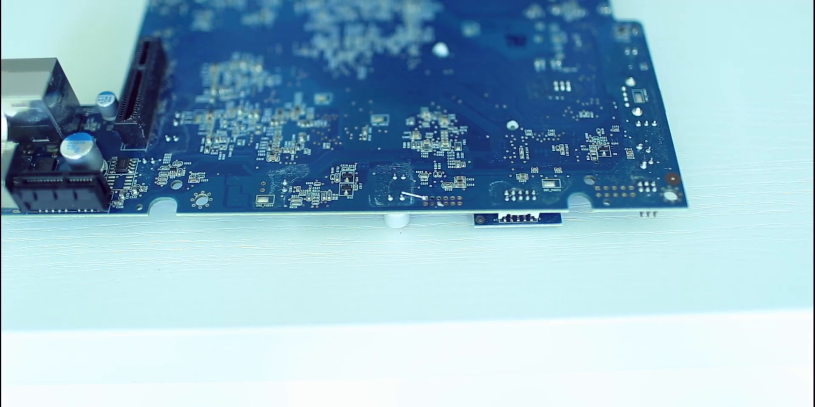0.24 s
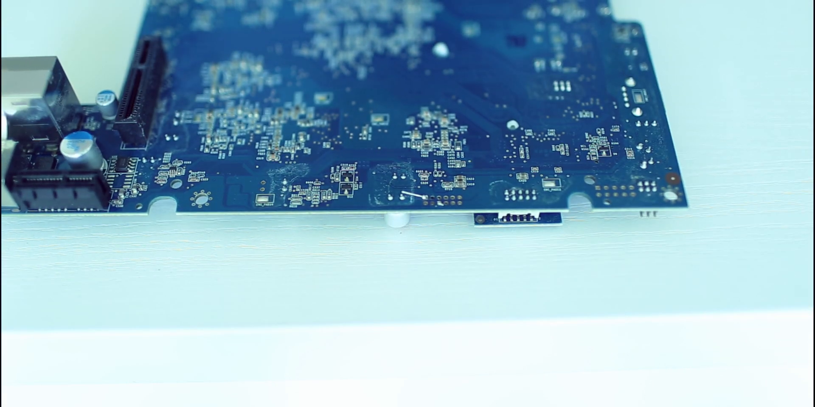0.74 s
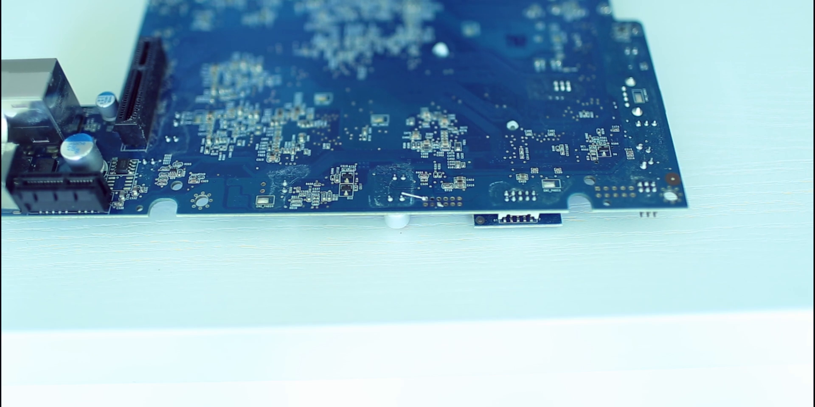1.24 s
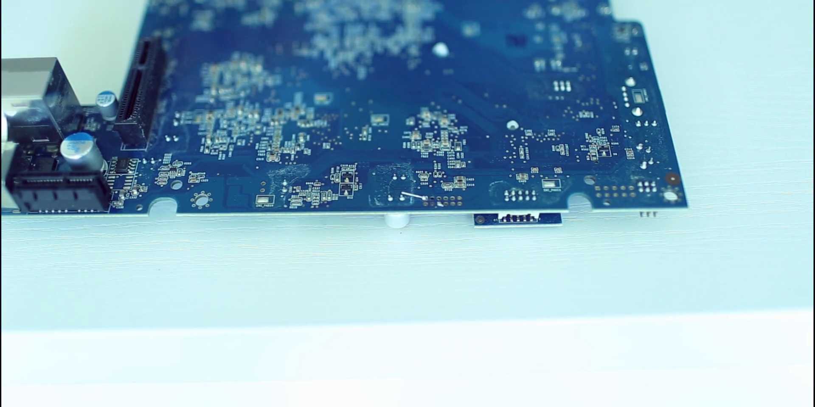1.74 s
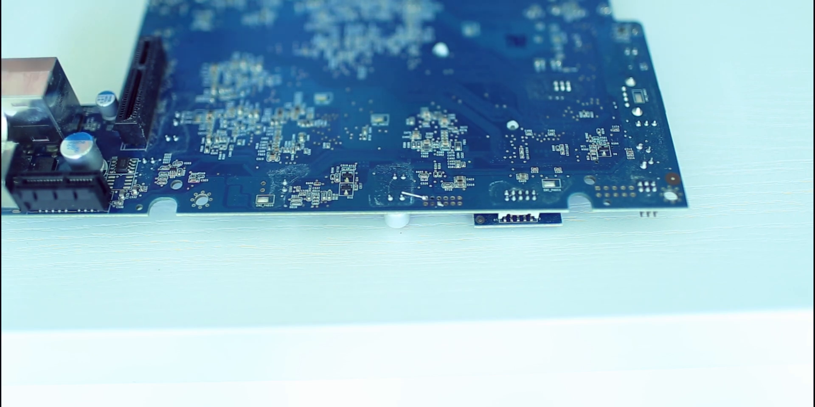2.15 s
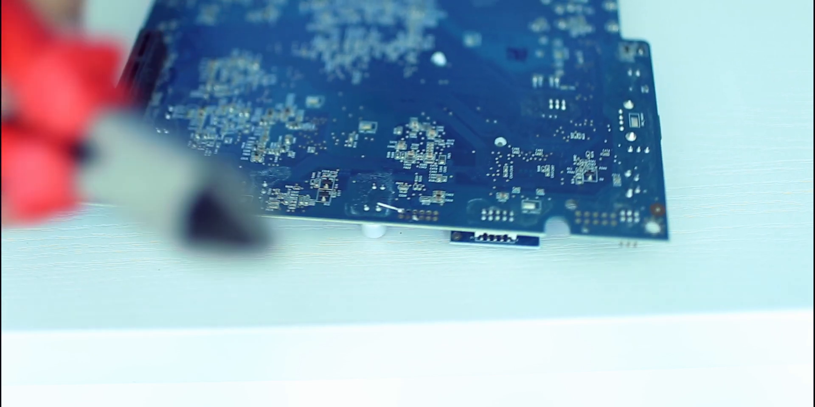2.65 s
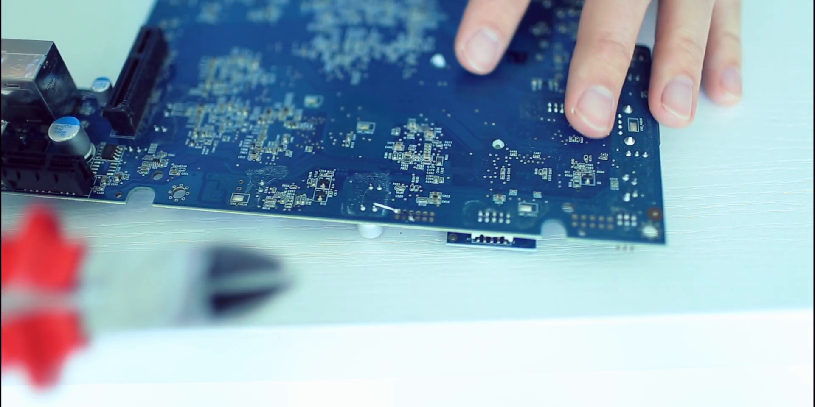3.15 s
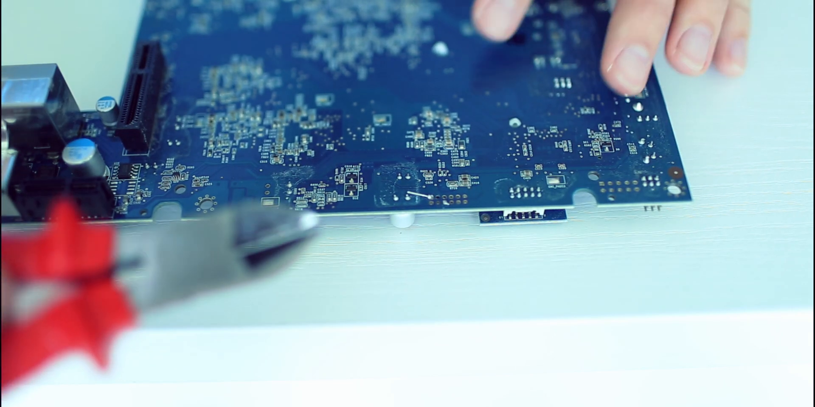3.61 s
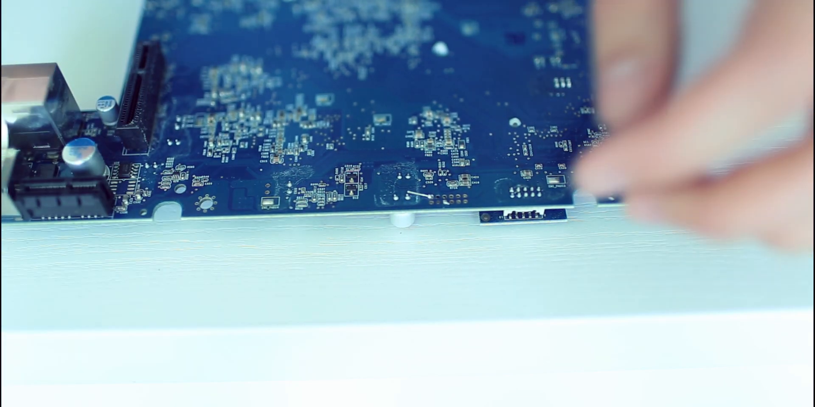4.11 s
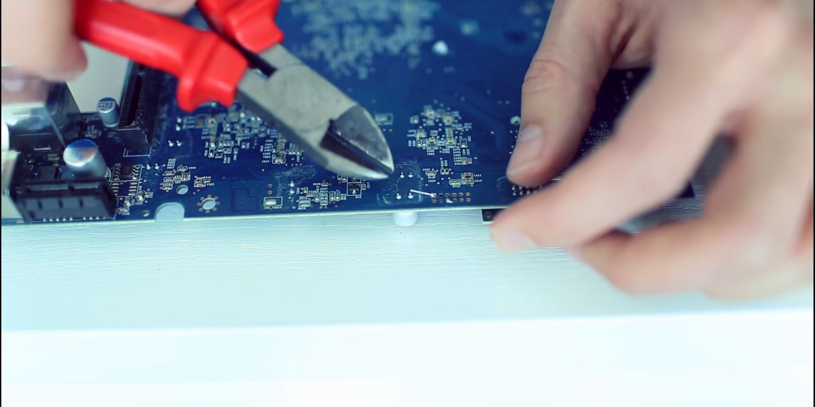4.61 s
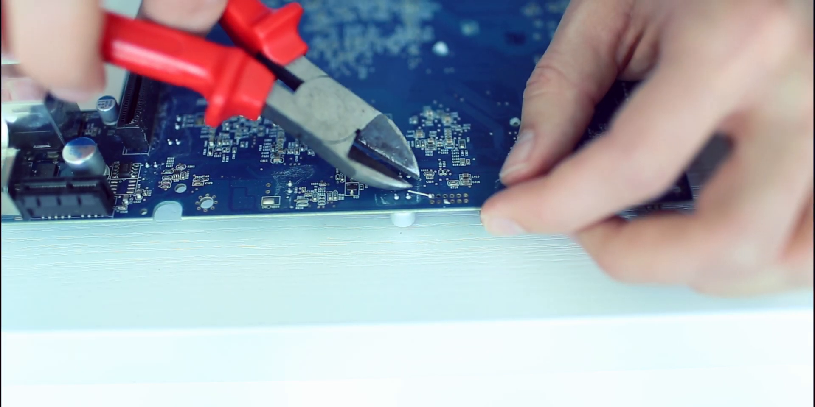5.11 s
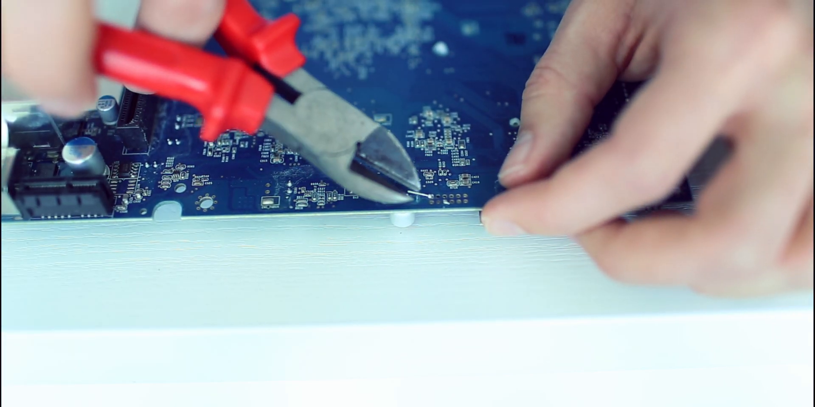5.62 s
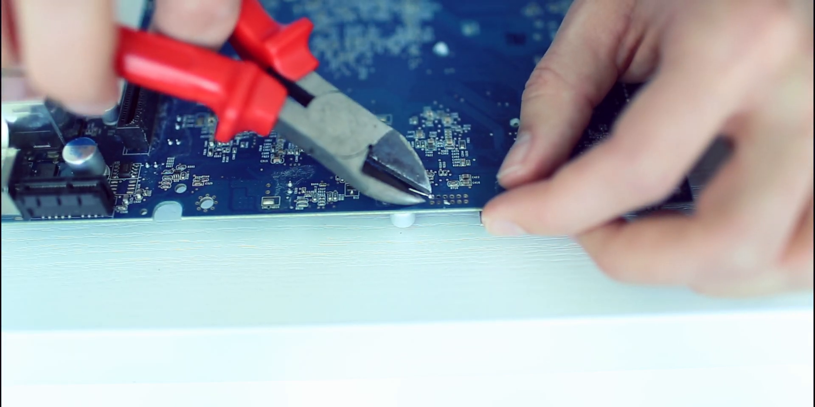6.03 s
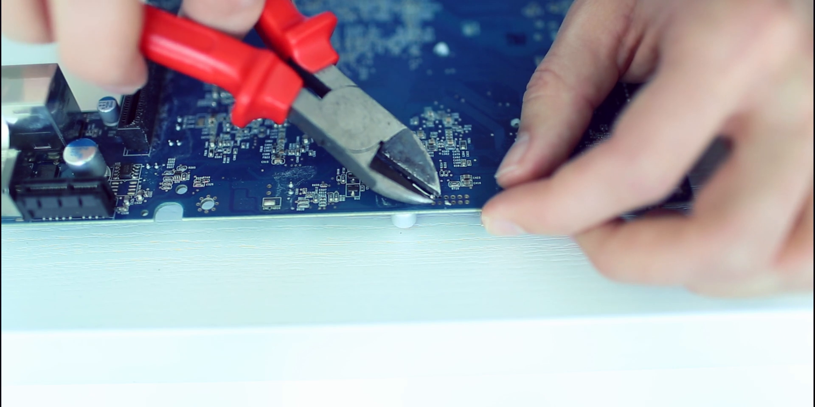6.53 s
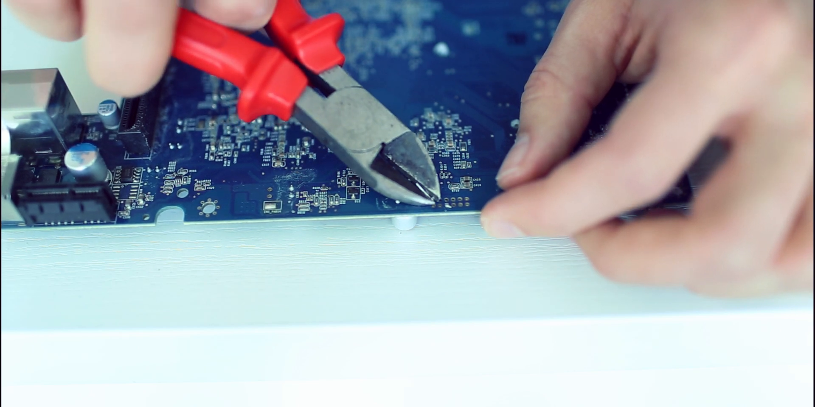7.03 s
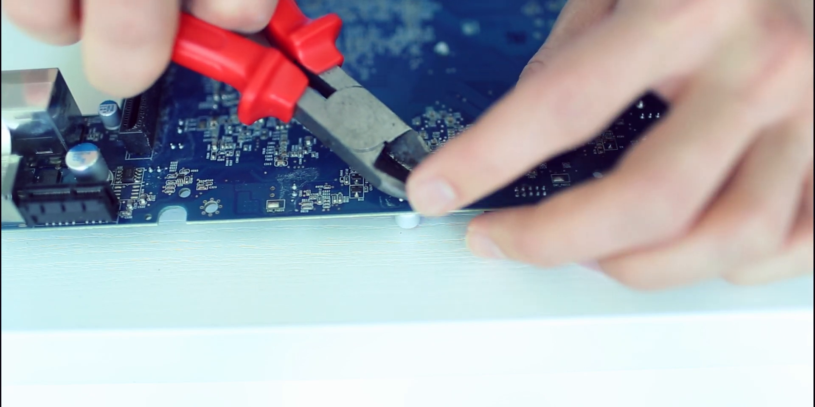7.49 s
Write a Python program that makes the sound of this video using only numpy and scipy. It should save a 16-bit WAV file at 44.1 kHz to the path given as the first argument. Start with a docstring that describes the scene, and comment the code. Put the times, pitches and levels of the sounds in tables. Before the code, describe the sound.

A hollow object rocks and settles, a tool knocks down, then a circuit board squeaks, rattles and is snipped once with side cutters.

```python
"""Circuit board work at a bench

In a small quiet room, something hollow rocks ever faster and settles, and a tool is put down with a knock.
A circuit board is shoved across the bench, squealing as it sticks and slips, and is nudged straight.
Side cutters tap among its pins and snip once. Blows and friction make each object ring at its own
natural pitches, called modes. Short echoes and a faint hiss lie behind it all."""
import sys
import numpy as np
from scipy import signal
from scipy.io import wavfile
from scipy.ndimage import uniform_filter1d

SR = 44100
rng = np.random.default_rng(int(sys.argv[2]) if len(sys.argv) > 2 else 0)


def unload_audio(sound):
    """Save the sound as a 16-bit wav file, at the path given as the first command line argument."""
    columns = np.transpose(np.atleast_2d(sound))
    # keep every value between -1 and 1, then stretch to whole-number steps
    steps = np.round(np.clip(columns, -1, 1) * 32767)
    wavfile.write(sys.argv[1], SR, steps.astype(np.int16))


N = 342216
T = np.arange(SR // 2) / SR  # the life of one sound, in seconds

# Taps on the board. Each row: start in seconds, level in dB, chatter time in seconds, hardness in dB,
# boost of the low modes in dB (set by the place struck).
BOARD_TAPS = [(0.086, -32, .009, -14, 2.5), (3.336, -7.5, 0.0084, 5, 9), (3.368, -5, 0.019, -2, 6),
              (3.42, -17, 0.0071, -4, 9), (3.444, -11, 0.024, -9, 0.5), (3.576, -13, 0.0052, -13, 2),
              (4.355, -34, 0.00098, 7, 1), (4.57, -26, 0.0084, -27, 10.5), (4.638, -39.5, 0.014, -25, 4),
              (4.875, -13.5, 0.0024, 0, 6), (5.21, -24.5, 0.015, 10, 15), (5.705, -22.5, 0.0042, -16, 0.5),
              (5.766, -17.5, 0.0086, -12.5, 4), (6.029, -34.5, 0.0034, -31.5, 10.5),
              (6.101, -49, 0.018, -21, -5), (6.172, -46.5, .006, 0.5, 7),
              (6.389, -29.5, 0.0063, -24.5, 1.5), (6.558, -47, 0.0063, 1.5, -2.5),
              (6.718, -54, .003, -8, -4.5), (7.317, -24.5, 0.015, -35, -9.5)]
# The board's ringing. Each row: pitch in Hz, level in dB, seconds to fade by 60 dB (called t60).
BOARD_MODES = [(590, -11, .25), (650, -10, .2), (760, -10, .2), (830, -4, .22), (900, -8, .12),
               (955, -1, .24), (995, -5, .2), (1150, -3, .22), (1218, 0, .25), (1357, -3, .22),
               (1440, -8, .18), (1500, -5, .2), (1537, -6, .2), (1664, -7, .22), (1975, -1, .2),
               (2040, -6, .14), (2086, -4, .15), (2172, -5, .15), (2300, -10, .08), (2451, -8, .18),
               (2505, -11, .15), (2620, -12, .12), (2885, -14, .17), (3220, -21, .08), (3980, -20, .07),
               (4200, -21, .08)]
# The board's crowd of fast-dying modes. Each row: frequency in Hz, level in dB.
BOARD_CLATTER = [(60, -36.5), (500, -22.5), (660, -8.5), (950, -2.5), (1500, -2.5), (1830, -13), (2020, 1),
                 (2450, -7), (2790, -15.5), (3100, -15.5), (4150, -21), (4700, -26.5), (9000, -32.5),
                 (15500, -50)]
# The long shove. Each row: time in seconds, relative friction level in dB, relative squeal level in dB.
SHOVE_LEVELS = [(2.578, -44, -34), (2.602, -26.5, -21.5), (2.622, -18.5, -21), (2.646, -22.5, -22.5),
                (2.664, -21.5, -19), (2.676, -25, -22.5), (2.724, -29, -28.5), (2.778, -45, -24.5),
                (2.9, -54.5, -78)]
# How the bench top deepens the drag. Each row: frequency in Hz, gain in dB.
DRAG_COLOUR = [(250, 2.5), (560, 7.5), (950, -2.5), (2500, -0.5)]
# Short slides. Each row: middle in seconds, level in dB, swell time in seconds, hardness in dB.
BOARD_SCRAPES = [(2.837, -38.5, 0.014, 1.5), (3.266, -19.5, 0.018, -5), (3.358, -17, 0.017, 10),
                 (3.467, -27.5, 0.019, -9), (3.538, -43.5, 0.025, 2), (4.857, -45.5, 0.021, -2),
                 (5.18, -42.5, 0.0096, -17.5), (5.692, -35.5, 0.008, 3), (5.739, -38.5, .017, -11.5),
                 (7.33, -37, 0.016, -31.5)]
# Cutter clicks. Each row: start in seconds, level in dB, chatter time in seconds, hardness in dB.
CUTTER_CLICKS = [(1.1367, -49, .001, 11), (1.155, -48, .0023, 17), (1.5663, -26, 0.02, 3),
                 (1.987, -49.5, 0.027, 1), (5.264, -12.5, 0.03, -5), (5.2998, -16.5, 0.0048, -8)]
# The steel jaws' ringing. Each row: pitch in Hz, level in dB, t60 in seconds.
JAW_MODES = [(2089, 0, .2), (2210, 0, .08), (2376, -3, .08), (3050, 0, .09), (4285, -9, .12),
             (5017, -2, .1), (5819, -3, .1), (6562, 0, .07), (7380, 0, .1), (8102, -3, .1), (8856, -5, .1),
             (9981, -7, .16)]
# The jaws breaking through wire. Each row: frequency in Hz, level in dB.
WIRE_CRACK = [(100, -31), (600, -10.5), (1700, -12), (2100, -0.5), (3100, -6), (3800, -11.5), (5000, -6),
              (7400, -4), (10300, -9.5), (11500, -17.5), (15500, -20.5)]
# A pin's ringing. Each row: pitch in Hz, level in dB, t60 in seconds.
PIN_MODES = [(1192, -0.5, 0.057), (2070, -11.5, 0.086), (3330, -11, 0.069)]
# Landings of the hollow thing. Each row: start in seconds, level in dB.
LANDINGS = [(0.8783, -19.5), (1.0353, -18.5), (1.237, -23), (1.3579, -19), (1.5002, -27.5), (1.607, -21),
            (1.7327, -31), (1.819, -25), (1.926, -37.5), (2.000, -29), (2.093, -45), (2.158, -36)]
# Its weaker modes. Each row: pitch in Hz, level in dB, t60 in seconds.
HOLLOW_MODES = [(250.4, -20.5, 0.17), (320.4, -14.5, 0.055), (754, -14.5, 0.049), (999, -26.5, 0.098),
                (1177, -23.5, 0.046), (1440, -28, 0.11), (1512, -23.5, 0.033)]
# The grit under its rim. Each row: frequency in Hz, gain in dB.
RIM_GRIT = [(80, -15), (300, 0), (600, 6), (900, -3), (1500, -2), (2200, -11), (4500, -13), (7000, -32)]
# Dead blows on the bench. Each row: start in seconds, level in dB.
BENCH_KNOCKS = [(2.2483, -4.5), (4.3544, -30)]
# The tone of one blow. Each row: frequency in Hz, level in dB.
KNOCK_COLOUR = [(40, -33.5), (150, -18), (400, 4), (650, 6), (950, -3), (1400, -23.5), (2200, -33),
                (4000, -35), (7000, -59), (15000, -59.5)]
# Bench and room answering a blow. Each row: frequency in Hz, level in dB.
KNOCK_ECHO_COLOUR = [(35, -53.5), (60, -25.5), (203, -16.5), (248, -5), (370, -5), (527, -2), (672, -1),
                     (938, -5.5), (1220, -7), (1740, -13.5), (3240, -17), (4940, -28.5), (12000, -50.5),
                     (15600, -76.5), (22000, -120)]
# The bench's shudder under a tap. Each row: frequency in Hz, level in dB.
THUD_COLOUR = [(40, -17.5), (80, -10), (125, 2.5), (240, 0.5), (420, 0.5), (700, -19), (3000, -60.5)]
# How long the room echoes. Each row: frequency in Hz, t60 in seconds.
ROOM_DECAY = [(100, .75), (400, .41), (1200, .36), (3000, .39), (7000, .39), (14000, .14)]
# Background hiss and rumble. Each row: frequency in Hz, relative level in dB.
HISS_COLOUR = [(20, 0), (45, -9), (70, -5.5), (140, 1), (260, 1), (420, -5.5), (1000, -8), (2000, -11.5),
               (4000, -12.5), (8000, -14.5), (15800, -17)]
# How alike the left and right hiss are. Each row: frequency in Hz, likeness from 0 to 1.
HISS_LIKENESS = [(30, .86), (120, .95), (500, .92), (2000, .7), (12000, .56)]


def taps(rebound_s=.018, rebound_db=-15):
    """Fingers and cutter tips bump the board, which drops back and rattles on the bench."""
    out = np.zeros(N)
    for s, db, chatter_s, hard_db, low_db in BOARD_TAPS:
        for at, level_db in (s, db), (s + rebound_s, db + rebound_db):
            body = response(BOARD_MODES, BOARD_CLATTER, clatter_t60=.021, ring_db=-7.5)
            lead_s, tap = strike(body, level_db - 8, chatter_s, board_contact(hard_db, low_db),
                                 chatter_db=1.5, graze_db=-13, graze_s=.0035)
            add(out, at - lead_s, tap)
    return out


def response(modes, clatter_colour, clatter_t60, ring_db):
    """A struck object gives a short dense clatter and a few modes that outlast it."""
    clatter = colour(dying_noise(clatter_t60), clatter_colour)
    return unit(clatter) + amp(ring_db) * unit(ring(modes))


def strike(body, db, chatter_s, weights, chatter_db, graze_db, graze_s, lead_s=.02):
    """Surfaces graze, hit and chatter. Returns the seconds before the hit, and the sound."""
    t = T - lead_s
    chatter = unit(grains(per_s=3000) * np.exp(-abs(t) / chatter_s) * (t >= 0))
    graze = unit(grains(per_s=1700) * np.exp(-abs(t) / graze_s) * (t < 0))
    force = amp(chatter_db) * chatter + amp(graze_db) * graze
    force[round(lead_s * SR)] += 1  # the hit itself
    sound = touch(excite(force, body), *weights)
    loudest = np.sqrt(uniform_filter1d(sound ** 2, size=256).max())
    return lead_s, amp(db) * sound / loudest


def board_contact(hard_db, low_db):
    """Harder contact wakes more high modes. Returns the low, upper and highest gains in dB."""
    return low_db, 2.5 + .61 * hard_db, hard_db


def touch(sound, low_db, upper_db, top_db):
    """The place and hardness of a contact weight the low, upper and highest modes."""
    gains = [(1100, low_db), (1400, 0), (1650, 0), (2300, upper_db), (4000, upper_db), (7500, top_db)]
    return colour(sound, gains)


def shove(slip_at_s=2.619, slip_gap_s=.0465, start_s=.012, stop_db_per_s=300):
    """The board sticks and slips: bright friction, a duller drag, and a squeal at each slip."""
    times, friction_db, squeal_db = np.transpose(SHOVE_LEVELS)
    t = times[0] + T
    slip = np.cos(2 * np.pi * (t - slip_at_s) / slip_gap_s)
    moving = np.minimum(T / start_s, 1) * amp(-stop_db_per_s * np.maximum(t - times[-1], 0))
    level_db = np.interp(t, times, friction_db) - slip  # friction dips 1 dB at each slip
    bright = rub(moving * amp(level_db + 2), (-7, 0, -9), ring_db=-3)
    drag = rub(moving * amp(.66 * level_db - 14), (4, -2, -10), ring_db=-5)
    tone = squeal() * moving * amp(np.interp(t, times, squeal_db) + 5 * slip - 1)
    out = np.zeros(N)
    add(out, times[0], bright + colour(drag, DRAG_COLOUR) + tone)
    return out


def squeal(hz=1358, waver=.016, overtone_db=-30):
    """The board's edge sings a slightly unsteady tone against the bench."""
    drift = uniform_filter1d(rng.standard_normal(len(T)), size=200)
    phase = 2 * np.pi * np.cumsum(hz * (1 + waver * drift / drift.std())) / SR
    return np.sqrt(2) * (np.sin(phase) + amp(overtone_db) * np.sin(2 * phase))


def rub(speed, weights, ring_db):
    """Tiny catches shake the board's modes, harder the faster it slides."""
    body = response(BOARD_MODES, BOARD_CLATTER, clatter_t60=.024, ring_db=ring_db)
    friction = excite(speed * grains(per_s=2500), body)
    return np.linalg.norm(speed) * unit(touch(friction, *weights))


def scrapes(lead_s=.1, fade_ratio=.85):
    """Each nudge slides the board a little: its speed swells, then fades a bit faster."""
    out = np.zeros(N)
    t = T - lead_s
    for s, db, swell_s, hard_db in BOARD_SCRAPES:
        width_s = np.where(t < 0, swell_s, fade_ratio * swell_s)
        speed = 1 / np.cosh(np.clip(t / width_s * np.pi / 2, -20, 20))
        add(out, s - lead_s, rub(amp(db) * speed, board_contact(hard_db, low_db=5.5), ring_db=-8))
    return out


def cutters(low_db=-11, upper_db=-5):
    """Steel jaws click, and crack through a wire."""
    out = np.zeros(N)
    for s, db, chatter_s, hard_db in CUTTER_CLICKS:
        body = response(JAW_MODES, WIRE_CRACK, clatter_t60=.027, ring_db=-20)
        lead_s, click = strike(body, db - 11, chatter_s, (low_db, upper_db, hard_db),
                               chatter_db=-4, graze_db=-22.5, graze_s=.0033)
        add(out, s - lead_s, click)
    return out


def pin_creak(at_s=7.152, peak_db=-40.5, swell_s=.004):
    """A cutter tip catches on a pin, and a few slips make it ring."""
    lead_s = 4 * swell_s
    slips = grains(per_s=3600) * np.exp(-((T - lead_s) / swell_s) ** 2)
    creak = excite(slips, ring(PIN_MODES))
    out = np.zeros(N)
    add(out, at_s - lead_s, amp(peak_db) * creak / abs(creak).max())
    return out


def rocking(push_hz=553, rise_hz_per_s=152, settle_from_s=1.277, after_hz=532, lead_s=.054):
    """Each soft landing swells for a few cycles, then the hollow thing rings on."""
    out = np.zeros(N)
    age = np.maximum(T - lead_s, 0)
    t = T - lead_s - .00591  # zero at the height of the push
    push = np.exp(-(t / .0043) ** 2)
    tick = (1 - np.exp(-(age / .001) ** 2)) * amp(-17 - 60 * age / .05)
    roll = amp(-29) * np.exp(-abs(t) / .075)  # the rim rolls before and after it lands
    after = (1 - np.exp(-(age / .0089) ** 2)) * amp(-60 * age / .07)
    for s, db in LANDINGS:
        # as it settles, the push climbs in pitch and the after-ring weakens
        settled_s = max(s - settle_from_s, 0)
        landing = push * np.cos(2 * np.pi * (push_hz + rise_hz_per_s * settled_s) * t)
        landing += amp(2.5 - 14 * settled_s) * after * np.cos(2 * np.pi * after_hz * t)
        landing += (tick + roll) * colour(rng.standard_normal(len(T)), RIM_GRIT)
        # no two landings touch the same spot, so the weaker modes vary
        modes = np.array(HOLLOW_MODES) + rng.standard_normal((len(HOLLOW_MODES), 3)) * [10, 2.5, 0]
        add(landing, lead_s + .000915, ring(modes) * (1 - np.exp(-T / .00078)))
        cavity = unit(dying_noise(t60=.18) * (T > .016))  # echoes inside the hollow
        add(out, s - lead_s, amp(db) * (landing + amp(-13) * excite(landing, cavity)))
    return out


def knocks(echo_db=-3, delay_s=.0014):
    """Dead blows land on the bench top, each with a wash of echoes."""
    blow = colour(signal.unit_impulse(len(T)), KNOCK_COLOUR)
    blow /= abs(blow).max()
    out = np.zeros(N)
    for s, db in BENCH_KNOCKS:
        wash = np.linalg.norm(blow) * unit(colour(echoes(), KNOCK_ECHO_COLOUR))
        add(out, s, amp(db) * blow)
        add(out, s + delay_s, amp(db + echo_db) * wash)
    return out


def thuds(share_db=-28, limit_db=-41):
    """The bench top answers each tap with a short low shudder."""
    out = np.zeros(N)
    for s, db, *_ in BOARD_TAPS:
        thud = colour(dying_noise(t60=.2), THUD_COLOUR)
        add(out, s, amp(min(db + share_db, limit_db)) * thud / abs(thud).max())
    return out


def room(sound, echo_db):
    """The direct sound arrives, followed by its echoes."""
    return sound + amp(echo_db) * excite(sound, echoes())


def echoes():
    """Dense echoes die away, each frequency band at its own speed."""
    hz, t, bands = signal.stft(rng.choice([-1., 1.], SR), SR, nperseg=256)
    bands *= amp(-60 * t / read(ROOM_DECAY, hz)[:, None])
    return unit(signal.istft(bands, SR, nperseg=256)[1])


def hiss(level_db=-61, drift_db=5):
    """Microphone hiss lies over a faint, gently shifting room rumble, in stereo."""
    hz = np.fft.rfftfreq(1024, 1 / SR)[:, None]
    a, b, c, d, drift = rng.standard_normal((N // 256 + 5, len(hz), 5)).T
    left, unrelated = a + 1j * b, c + 1j * d
    likeness = read(HISS_LIKENESS, hz)
    right = likeness * left + np.sqrt(1 - likeness ** 2) * unrelated
    drift = uniform_filter1d(drift, size=3, axis=0)  # smooth across frequency
    drift = uniform_filter1d(drift, size=20, axis=1)  # and over time
    gain = amp(read(HISS_COLOUR, hz) + drift_db * drift / drift.std() / (1 + hz / 600))
    noise = signal.istft(np.array([left, right]) * gain, nperseg=1024, noverlap=768)[1][:, :N]
    return amp(level_db) * noise / noise.std()


def ring(modes):
    """Each mode is a dying sine wave; every second one is flipped."""
    return sum((-1) ** k * amp(db - 60 * T / t60) * np.sin(2 * np.pi * hz * T)
               for k, (hz, db, t60) in enumerate(modes))


def grains(per_s):
    """Tiny random catches between two rough surfaces."""
    return rng.standard_normal(len(T)) * (rng.random(len(T)) < per_s / SR)


def dying_noise(t60):
    """Noise that fades by 60 dB in t60 seconds."""
    return rng.choice([-1., 1.], len(T)) * amp(-60 * T / t60)


def excite(force, body):
    """Every sample of the force sets off its own copy of the body's response."""
    return signal.fftconvolve(force, body)[:len(force)]


def colour(sound, points, size=4096):
    """Shapes the tone by rows of Hz and dB, with no ringing ahead of the sound."""
    log_gain = np.log(amp(read(points, abs(np.fft.fftfreq(size, 1 / SR)))))
    impulse = np.fft.ifft(np.exp(np.conj(signal.hilbert(log_gain)))).real
    return excite(sound, impulse[:size // 2])


def read(points, hz):
    """Reads between a table's rows on a log-frequency scale."""
    row_hz, value = np.transpose(points)
    return np.interp(np.log(hz + 1), np.log(row_hz + 1), value)


def amp(db):
    """Turns decibels into a gain."""
    return 10 ** (np.asarray(db) / 20)


def unit(sound):
    """Scales a sound to an energy of one."""
    return sound / np.sqrt(np.sum(sound ** 2) + 1e-20)


def add(mix, s, sound):
    """Mixes a sound in, starting at s seconds."""
    part = mix[round(s * SR):][:len(sound)]
    part += sound[:len(part)]


def scene():
    """Mixes everything; only the hiss differs between left and right."""
    board = room(taps() + scrapes() + pin_creak(), echo_db=-16) + room(shove(), echo_db=-21) + thuds()
    return board + room(cutters(), echo_db=-13) + rocking() + knocks() + hiss()


def record(dry):
    """Cuts off the very highest treble."""
    lowpass = signal.firwin(511, cutoff=15850, window=("kaiser", 9), fs=SR)
    return signal.oaconvolve(dry, lowpass[None], "same")


dry = scene()
out = record(dry)
unload_audio(out)
```